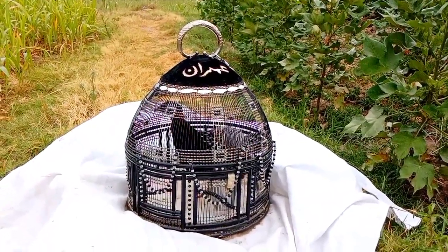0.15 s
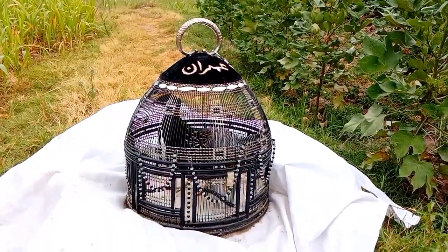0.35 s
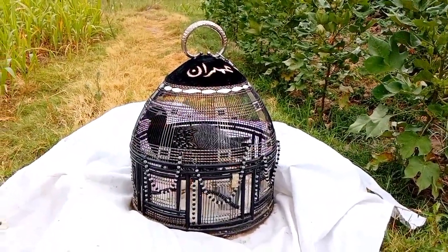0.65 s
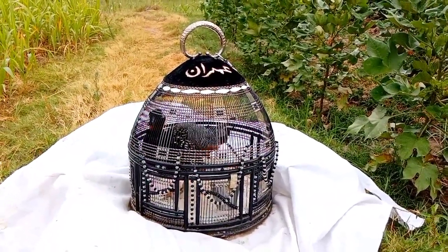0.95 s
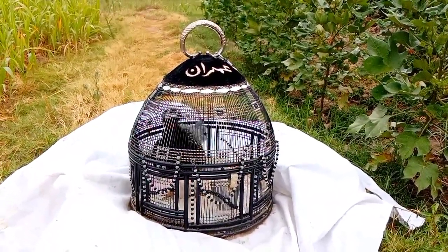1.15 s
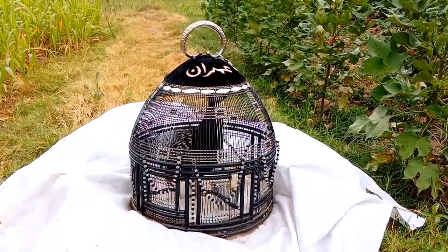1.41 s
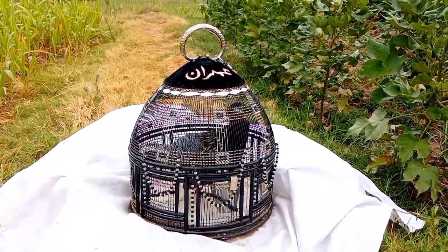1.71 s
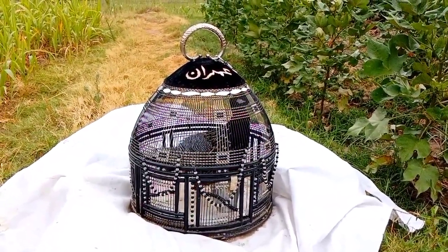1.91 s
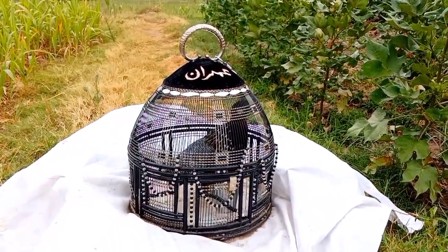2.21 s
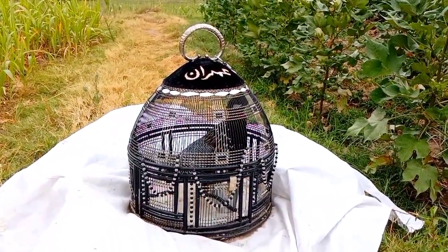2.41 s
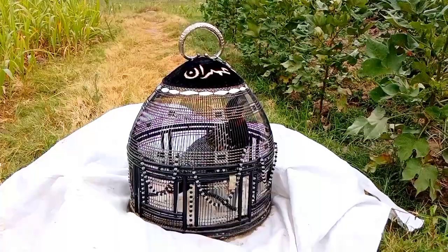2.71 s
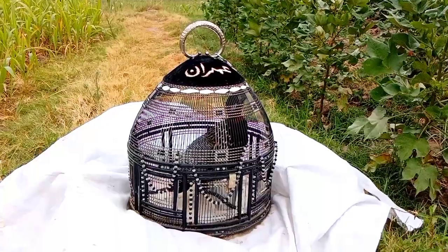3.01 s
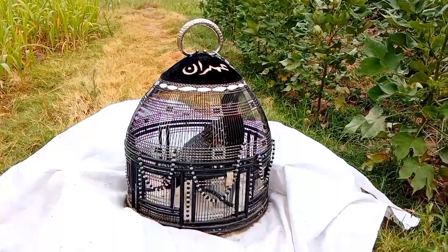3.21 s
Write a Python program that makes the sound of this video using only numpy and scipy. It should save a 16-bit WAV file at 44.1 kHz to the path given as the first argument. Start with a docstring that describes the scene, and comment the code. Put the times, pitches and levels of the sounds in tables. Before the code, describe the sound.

A francolin calls close by from a wire cage in a field. A thin nasal whine swells from 0.45 to 0.95 seconds. After a pause, a sharp falling chip and high squeak snap at 2.22-2.3. Loud, bright grating rasps follow at 2.73-2.9 and 3.05-3.3, the second briefly cracking into a squeak near 3.24. Faint engine hum, moving air, distant birds, a far whirr and early and 2.3-2.7-second high trills lie behind, with slight echo.

```python
"""Outdoors, close to a wire cage in a field: a francolin gives a thin swelling whine, a sharp click (a falling
chip and a high squeak), then two harsh rasps, the second breaking into the squeak for a moment.
The whine is drifting partials, the click gliding sines, the rasps rough pulses and noise through resonances.
Reflections near the cage hollow out the rasps, and the field echoes faintly. In the distance an engine hums
unsteadily under moving air, a far whirr, a soft wash of birds in noise bands and notes, and thin high trills."""
import sys
import numpy as np
from scipy import signal
from scipy.fft import rfft, irfft, next_fast_len
from scipy.io import wavfile
from scipy.ndimage import uniform_filter1d, map_coordinates

SR = 44100
rng = np.random.default_rng(int(sys.argv[2]) if len(sys.argv) > 2 else 0)


def store_wav(level_fs):
    """Save 16-bit WAV to argv[1]."""
    pcm = np.round(np.clip(np.atleast_2d(level_fs), -1, 1) * 32767)
    wavfile.write(sys.argv[1], SR, pcm.T.astype(np.int16))


N = 147735
TIME = np.arange(N) / SR

# partials of the distant engine: (frequency [Hz], level before the moving level [dB])
HUM_PARTIALS = [(75.4, -56.5), (96.9, -62.5), (150.7, -67.5), (188.4, -71.5), (226.1, -75.5)]
# moving level added to every engine partial: (time [s], level [dB])
HUM_LEVEL = [(0, 4), (.9, 4.5), (1.75, 2.5), (1.85, -6), (2.05, 2), (2.7, 2.5), (2.78, -32), (3.0, 6),
             (3.15, -18), (3.35, 0)]
HUM_WAVER_DB, HUM_DRIFT_RAD = 1.3, 0.3
# spectrum of the moving air: (frequency [Hz], relative level [dB])
AIR_SPECTRUM = [(15, -68), (25, -8), (50, -18), (81, 5), (202, -14), (271, -18.5), (501, -18.5),
                (691, -21.5), (1030, -16.5), (1240, -6), (1500, -16.5), (2130, -22.5), (2930, -25.5),
                (3260, -45), (4500, -30.5), (5280, -21.5), (6370, -44), (12800, -48.5), (15000, -49)]
AIR_DB = -53.5
# bands of the distant birds: (centre [Hz], width [Hz], level before the moving level [dB])
CHORUS_BANDS = [(938, 102, -12.5), (1696, 220, -12.5), (2192, 240, -7.5), (2840, 200, -9),
                (3257, 130, -5.5), (3830, 210, -15), (5200, 93, -17.5)]
# moving level of all the distant birds: (time [s], level [dB])
CHORUS_LEVEL = [(0, -55), (.35, -58.5), (.7, -55.5), (1.2, -50.5), (1.7, -50.5), (1.95, -51.5),
                (2.15, -56.5), (2.6, -55.5), (3.35, -54)]
CHORUS_SWING_DB = 1.8
# single far-off notes; the glide is a share of pitch, the level comes before the moving level
FAR_LOW_HZ, FAR_HIGH_HZ, FAR_LENGTH_S, FAR_GLIDE, FAR_DB = 1588, 3873, 0.045, 0.044, -5.5
# far-off steady whirr: (time [s], level [dB])
WHIRR_LEVEL = [(0, -65), (.2, -62), (.45, -50), (.95, -51), (1.08, -55.5), (1.3, -51.5), (1.58, -61.5),
               (1.68, -43), (1.74, -64), (1.82, -54.5), (1.92, -80), (2.6, -52.5), (3.35, -62)]
WHIRR_HZ, WHIRR_WIDTH_HZ = 1243, 40.5
# thin reeling trills: (start [s], end [s], level before mixing [dB], centre [Hz], swell [s])
TRILLS = [(-.2, 0.144, -60, 7860, 0.15), (0.303, 0.741, -61, 8900, 0.28), (2.32, 2.669, -61, 8870, 0.16)]
TRILL_RATE_HZ, TRILL_SWEEP_HZ, TRILL_SWELL_DB, TRILL_RELEASE_S = 130, 1840, 26.5, 0.0093

# effort of the whine: (time [s], level [dB])
WHINE_LEVEL = [(0.44, -84), (0.484, -45.5), (0.534, -43), (0.854, -30.5), (0.93, -30), (0.948, -37),
               (0.96, -47), (0.98, -66)]
# shared drift of the whine's partials: (time [s], pitch [ratio])
WHINE_PITCH = [(.46, 1.008), (.53, 1), (.6, .998), (.68, 1.001), (.78, 1), (.83, 1.002), (.89, .999),
               (.97, 1)]
# partials of the whine: (frequency [Hz], level before opening [dB], level when open [dB])
WHINE_PARTIALS = [(409, -24, -33), (2056, -26, -29), (2460, -17, -23), (2530, -16, -20), (2740, -9, -8),
                  (2871, -8, -5), (3084, -10, 0), (3283, -2, -5), (3429, -10, -11), (3693, -3, -9),
                  (3769, -13, -21), (4103, -15, -24), (4455, -17, -36), (5744, -22, -30), (6970, -28, -38)]
# when the whine's colour opens: (start [s], end [s])
WHINE_OPEN_S = (.56, .78)
# colour of the rustle in the whine: (frequency [Hz], relative level [dB])
WHINE_NOISE = [(1500, -19.5), (2300, -21), (2800, 10), (3700, 0), (4300, -24), (4700, -25), (5200, -8),
               (6300, -23), (7200, -9), (8000, -21), (9500, -28), (12000, -42), (15000, -49)]
WHINE_NOISE_DB = -10.5  # under the whine's tone

# clean falling chip: (time [s], pitch [Hz], level [dB])
CHIP = [(2.224, 3620, -30.5), (2.229, 2860, -29.5), (2.2325, 2277, -9.5), (2.2355, 1700, -22.5),
        (2.238, 1550, -16), (2.243, 1522, -19), (2.249, 1530, -43)]
# high squeak after it: (time [s], pitch [Hz], level [dB])
SQUEAK = [(2.261, 1513, -40), (2.263, 2713, -29), (2.265, 5900, -17.5), (2.268, 6636, -8.5),
          (2.276, 7200, -22), (2.281, 7330, -13), (2.29, 7150, -13.5), (2.2945, 6823, -9),
          (2.297, 2926, -18), (2.3, 1600, -26.5), (2.307, 1500, -54)]
# squeak that breaks into the last rasp: (time [s], pitch [Hz], level [dB])
BREAK = [(3.232, 6590, -30), (3.24, 7200, -15.5), (3.247, 7380, -19), (3.256, 7240, -20.5),
         (3.2595, 7180, -15.5), (3.263, 2750, -25), (3.266, 1666, -30), (3.274, 1588, -43)]
OVERTONE_DB, WHISTLE_WANDER = -20.5, 0.0095  # the wander is a share of pitch
# rough bursts where the voice changes register: (time [s], level [dB], t60 [s])
BURSTS = [(2.2255, -26.5, .04), (2.232, -19, .045), (2.263, -13, .025), (2.2955, -17, .055)]
# colour of the bursts: (frequency [Hz], relative level [dB])
BURST_COLOUR = [(150, -18.5), (400, -22.5), (900, -37), (1600, -4.5), (2800, 8), (4500, 4.5), (7000, 5.5),
                (10000, -3), (13000, -27), (15000, -10)]
# soft low thumps under the squeaks: (time [s], level [dB], t60 [s])
THUMPS = [(2.279, -39.5, 0.056), (2.295, -40, 0.026), (3.243, -41.5, 0.027)]
# colour of the thumps: (frequency [Hz], relative level [dB])
THUMP_COLOUR = [(80, -28), (190, 7), (420, 1), (750, -14.5), (1500, -45)]
PUFF_RISE_S = 0.004  # time for a 60 dB rise

# effort of the rasps, one table per call: (time [s], level [dB])
RASP_LEVELS = [
    [(2.734, -25), (2.742, -13), (2.854, -13.5), (2.878, -15), (2.9, -40.5)],
    [(3.05, -49), (3.064, -17.5), (3.108, -12), (3.232, -15), (3.252, -56), (3.26, -22), (3.28, -16),
     (3.305, -51)],
]
# throaty band under the rasps, one table per call: (time [s], level [dB])
THROATY_LEVELS = [
    [(2.734, -47), (2.738, -32.5), (2.776, -49.5), (2.782, -43), (2.862, -50), (2.884, -29.5), (2.9, -64)],
    [(3.053, -31), (3.065, -21), (3.113, -42), (3.165, -36.5), (3.235, -41), (3.251, -89), (3.263, -32.5),
     (3.283, -26), (3.305, -80)],
]
# pulses of the rasps: (time [s], rate [Hz], roughness [0-1])
PULSING = [(2.735, 275.5, .5), (2.78, 277.8, .4), (2.82, 275.9, .2), (2.86, 237.7, .2), (2.885, 227.7, .7),
           (3.06, 301, .9), (3.1, 294.9, .5), (3.14, 261.3, .3), (3.18, 265, .35), (3.23, 273.3, .5),
           (3.28, 257.5, .9)]
JITTER_S, SCATTER_DB, FLUTTER = 0.00006, 6, 0.015  # the flutter is a share of the pulse rate
# moving resonances of the rasps: (time [s], first [Hz], second [Hz], third [Hz])
FORMANTS = [(2.735, 2966, 3853, 5044), (2.791, 3018, 3915, 5623), (2.818, 3050, 3617, 5214),
            (2.844, 3160, 3797, 5680), (2.88, 3170, 3680, 5520), (3.08, 2750, 3750, 5315),
            (3.111, 3050, 3830, 5430), (3.15, 2860, 3890, 5380), (3.2, 2720, 3672, 5390),
            (3.235, 2800, 3880, 5620), (3.28, 2900, 3830, 5450)]
# the three resonances in order: (width [Hz], level [dB])
FORMANT_SHAPE = [(110, -10), (110, -17), (110, -21)]
# clear threads of tone on the three resonances, before a doubling and the roughness: (level [dB])
THREAD_DB = [-7.5, -13, -10.5]
THREAD_WANDER = 0.0092  # share of pitch
# bright colour of the throat: (frequency [Hz], relative level [dB])
THROAT = [(1200, -39.5), (2000, -26.5), (2400, -20.5), (2700, -5), (3000, -5), (3700, 1.5), (4500, 0.5),
          (5400, -4), (6300, -5.5), (7500, -7), (8300, -6.5), (9500, -13), (11000, -22.5), (12500, -31.5),
          (13700, -35), (15000, -23), (15600, -35)]
# colour of the throaty band: (frequency [Hz], relative level [dB])
THROAT_LOW = [(150, -55), (450, -39), (850, -34), (1100, -21.5), (1400, -10), (1620, 3), (1850, -1),
              (2200, -2.5), (2700, -15), (5000, -58)]
# bands cancelled by close reflections, reinforced where negative: (centre [Hz], width [Hz], depth [dB])
HOLLOWS = [(1960, 80, 16), (2450, 50, -2.5), (3420, 69, 12), (4073, 30, 31), (4840, 41, 14.5),
           (5600, 60, -0.5), (6250, 51, 20.5), (6960, 90, 14), (8220, 390, 13.5)]

# echo close to the cage: (frequency [Hz], t60 [s])
NEAR = [(200, .05), (3000, 0.066), (14000, 0.1)]
# ringing of the whistles in the cage: (frequency [Hz], t60 [s])
CAGE_RING = [(1000, .03), (3000, 0.066), (7000, 0.14), (14000, 0.12)]
# echo of the open field: (frequency [Hz], t60 [s])
FIELD = [(200, .4), (3000, 0.82), (7000, 0.49), (14000, .3)]
# late return from the trees: (frequency [Hz], t60 [s])
TREES = [(1000, .1), (5000, 0.18), (7000, .45), (14000, .5)]
# scatter of the trills in the bushes: (frequency [Hz], t60 [s])
LEAVES = [(5000, .05), (12000, .05)]
NEAR_DB, CAGE_RING_DB, FIELD_DB = -13.5, -15.5, -26
TREES_DB, TREES_DELAY_S = -41, 0.11
PEAK_TOP, TOP_HZ = 0.65, 15550  # microphone: peak ceiling (full scale 1) and band limit


def amp(db):
    """Decibels to gain."""
    return 10 ** (np.asarray(db) / 20)


def unit(x):
    """Scaled to rms 1."""
    return x / np.sqrt(np.mean(x ** 2) + 1e-20)


def along(points, hz):
    """Values of (Hz, value) points, read on a log frequency axis."""
    f, v = np.transpose(points)
    return np.interp(np.log(hz + 1), np.log(f + 1), v)


def curves(rows):
    """One value per sample for each column after the time."""
    s, *columns = np.transpose(rows)
    return [np.interp(TIME, s, column) for column in columns]


def envelope(rows):
    """Gain from the last column (dB), silent outside the rows."""
    return amp(curves(rows)[-1]) * (TIME >= rows[0][0]) * (TIME <= rows[-1][0])


def wobble(rate):
    """A smooth random curve with rate knots a second."""
    return map_coordinates(rng.standard_normal(int(N * rate / SR) + 4), [TIME * rate])


def turning(hz):
    """Phase in radians of a changing frequency."""
    return 2 * np.pi * np.cumsum(hz) / SR


def coloured(x, db_of_hz):
    """x through a causal minimum-phase filter with the given gain, at rms 1."""
    m = 2 * next_fast_len(N)
    cepstrum = irfft(np.log(amp(db_of_hz(np.fft.rfftfreq(m, 1 / SR))) + 1e-6))
    # folding the cepstrum forward makes the filter causal
    cepstrum[1:m // 2] *= 2
    cepstrum[m // 2 + 1:] = 0
    return unit(irfft(rfft(x, m) * np.exp(rfft(cepstrum)))[:N])


def noise(db_of_hz):
    """Steady noise of rms 1 with the given spectrum."""
    m = next_fast_len(N + SR // 4, True)
    gain = amp(db_of_hz(np.fft.rfftfreq(m, 1 / SR)))
    return unit(irfft(rfft(rng.standard_normal(m)) * gain, m)[:N])


def band(hz, width):
    """A band of noise with steep sides."""
    def shape(f):
        sides = -20 * np.log10(1 + ((f - hz) / width) ** 2)
        return sides - 10 * np.log10(1 + (f / (2 * hz)) ** 8)
    return noise(shape)


def hollows(hz):
    """Gain in dB where close reflections cancel or reinforce the sound."""
    return -sum(db / (1 + ((hz - centre) / width) ** 2) for centre, width, db in HOLLOWS)


def echo(x, decay):
    """A diffuse tail of decaying noise in which each frequency dies at its own speed."""
    hz, t, z = signal.stft(rng.standard_normal(SR), SR, nperseg=256)
    tail = signal.istft(z * amp(-60 * t / along(decay, hz)[:, None]), SR, nperseg=256)[1]
    delayed = np.pad(tail, (SR // 300, 0))
    return signal.fftconvolve(x, delayed / np.linalg.norm(tail))[:N]


def engine_hum():
    """A distant engine: low sine partials whose levels and phases waver, with a moving overall level."""
    hum = np.zeros(N)
    for hz, db in HUM_PARTIALS:
        gain = np.sqrt(2) * amp(db + HUM_WAVER_DB * wobble(14))
        hum += gain * np.sin(2 * np.pi * hz * TIME + HUM_DRIFT_RAD * wobble(10))
    return amp(curves(HUM_LEVEL)[0]) * hum


def moving_air():
    """Moving air at the microphone's place: steady, mostly low noise."""
    return amp(AIR_DB) * noise(lambda f: along(AIR_SPECTRUM, f))


def far_calls(count):
    """Short gliding notes, scattered in time and pitch and blurred by distance."""
    out = np.zeros(N + SR)
    t = np.arange(SR // 4) / SR
    u = (t - t.mean()) / FAR_LENGTH_S
    for when, height, slope, size in rng.random((count, 4)):
        pitch = FAR_LOW_HZ * (FAR_HIGH_HZ / FAR_LOW_HZ) ** height
        hz = pitch * (1 + FAR_GLIDE * (2 * slope - 1) * u)
        out[int(when * N):][:len(t)] += (0.5 + size) * np.exp(-u ** 2) * np.sin(turning(hz))
    return unit(echo(out[:N], FIELD))


def distant_birds():
    """Far-off birds merge into swinging bands of noise, with faint single notes among them."""
    wash = sum(amp(db + CHORUS_SWING_DB * wobble(33)) * band(hz, width) for hz, width, db in CHORUS_BANDS)
    return amp(curves(CHORUS_LEVEL)[0]) * (wash + amp(FAR_DB) * far_calls(count=60))


def far_whirr():
    """A far whirr: a narrow noise band at steady pitch and changing level."""
    return amp(curves(WHIRR_LEVEL)[0]) * band(WHIRR_HZ, WHIRR_WIDTH_HZ)


def trills():
    """An insect or tiny bird reels out high downward sweeps; each trill swells and stops short."""
    out = np.zeros(N)
    for start, end, db, hz, swell_s in TRILLS:
        cycle = (turning(TRILL_RATE_HZ * (1 + 0.019 * wobble(20))) / (2 * np.pi)) % 1
        pitch = hz + TRILL_SWEEP_HZ * (0.5 - cycle) + 25 * wobble(130)
        sweeps = unit(np.sin(np.pi * cycle) * np.sin(turning(pitch)))
        gate = np.clip(np.minimum(TIME - start, end - TIME) / TRILL_RELEASE_S, 0, 1)
        swell_db = -TRILL_SWELL_DB * np.clip(1 - (TIME - start) / swell_s, 0, 1)
        out += sweeps * gate * amp(db + swell_db + wobble(68))
    return out


def whine():
    """A nasal note whose colour opens as it swells; its partials drift together over a soft rustle."""
    clock = turning(curves(WHINE_PITCH)[0] * (1 + 0.0008 * wobble(60)))
    opening = np.interp(TIME, WHINE_OPEN_S, (0, 1))
    tone, power = np.zeros(N), np.zeros(N)
    for hz, closed_db, open_db in WHINE_PARTIALS:
        gain = amp(closed_db + (open_db - closed_db) * opening + 1.6 * wobble(20))
        tone += gain * np.cos(hz * clock + 0.16 * wobble(20))
        power += gain ** 2
    tone = unit(tone / np.sqrt(power))  # the effort alone sets the level
    rustle = noise(lambda f: along(WHINE_NOISE, f) + hollows(f))
    return envelope(WHINE_LEVEL) * (tone + amp(WHINE_NOISE_DB) * rustle)


def whistles():
    """Chip, squeak and break: fast clean sine glides with a weak octave."""
    out = np.zeros(N)
    for rows in (CHIP, SQUEAK, BREAK):
        phase = turning(curves(rows)[0] * (1 + WHISTLE_WANDER * wobble(700)))
        tone = np.sin(phase) + amp(OVERTONE_DB) * np.sin(2 * phase)
        out += np.sqrt(2) * envelope(rows) * tone
    return out


def puffs(rows, colour):
    """Short noisy cracks or thumps as the voice jumps between registers."""
    level = np.zeros(N)
    for s, db, t60 in rows:
        slope_s = np.where(TIME < s, PUFF_RISE_S, t60)
        level += amp(db - 60 * np.abs(TIME - s) / slope_s)
    return level * noise(lambda f: along(colour, f) + hollows(f))


def pulse_train(phase, rough):
    """Band-limited clicks, one a cycle, late or early by the roughness and uneven in strength."""
    cycles = np.arange(1, phase[-1] // (2 * np.pi))
    at = np.interp(cycles * 2 * np.pi, phase, np.arange(N))
    chance = rng.standard_normal((N // 100, 2))[:len(at)]
    at = at + SR * JITTER_S * chance[:, 0] * rough[at.astype(int)]
    # a windowed sinc places each click between samples
    taps = at.astype(int)[:, None] + np.arange(-7, 9)
    offset = taps - at[:, None]
    click = np.sinc(offset) * np.cos(np.pi * offset / 16) ** 2
    strength = amp(SCATTER_DB * chance[:, 1:])
    pulses = unit(np.bincount(np.clip(taps, 0, N - 1).ravel(), (click * strength).ravel(), N))
    return coloured(pulses, lambda f: -12 / (1 + (6500 / (f + 1)) ** 6))  # softer treble


def resonance(x, hz, width_hz):
    """A resonance with a moving centre: x is shifted to zero frequency, smoothed and shifted back."""
    carrier = np.exp(1j * turning(hz))
    smoothed = signal.lfilter([1], [1, -np.exp(-np.pi * width_hz / SR)], x / carrier)
    return unit((smoothed * carrier).real)


def rasps():
    """Uneven pulses and gated turbulence ring the throat and its moving resonances."""
    hz, rough = curves(PULSING)
    phase = turning(hz * (1 + FLUTTER * wobble(110)))
    pulses = pulse_train(phase, rough)
    turbulence = unit(rng.standard_normal(N) * (1 + 0.3 * np.cos(phase - 2)))
    source = 0.59 * np.sqrt(1 - rough) * pulses + np.sqrt(rough) * turbulence
    bright = coloured(source, lambda f: along(THROAT, f))
    centres = curves(FORMANTS)
    ringing = sum(amp(db) * resonance(bright, centre, width)
                  for centre, (width, db) in zip(centres, FORMANT_SHAPE))
    voice = unit(bright + ringing)
    # threads of tone come clear where the rasp is least rough
    for centre, db in zip(centres, THREAD_DB):
        thread = np.sin(turning(centre * (1 + THREAD_WANDER * wobble(250))))
        voice = voice + 2 * amp(db) * (1 - rough) ** 2 * thread
    # the membrane's swing is limited
    voice = voice / np.sqrt(np.abs(uniform_filter1d(voice ** 2, size=110)) + 0.065)
    voice = coloured(voice, lambda f: hollows(f) - 25 / (1 + (f / 1700) ** 8))
    throaty = coloured(source, lambda f: along(THROAT_LOW, f) + hollows(f))
    return voice * sum(map(envelope, RASP_LEVELS)) + throaty * sum(map(envelope, THROATY_LEVELS))


def tree_return(clear):
    """The whistles' treble comes back late and diffuse from the trees."""
    high = signal.sosfilt(signal.butter(4, 5000, "high", fs=SR, output="sos"), clear)
    return amp(TREES_DB) * np.interp(TIME - TREES_DELAY_S, TIME, echo(high, TREES), left=0)


def scene():
    """The caged bird with its near and far echoes, before the distant background and the trills."""
    background = engine_hum() + moving_air() + distant_birds() + far_whirr()
    reeling = trills()
    reeling = 0.44 * reeling + 0.95 * echo(reeling, LEAVES)
    clear = whistles()
    bird = whine() + clear + puffs(BURSTS, BURST_COLOUR) + puffs(THUMPS, THUMP_COLOUR) + rasps()
    near = amp(NEAR_DB) * echo(bird, NEAR) + amp(CAGE_RING_DB) * echo(clear, CAGE_RING)
    far = amp(FIELD_DB) * echo(bird, FIELD) + tree_return(clear)
    return (bird + near + far + background + reeling)[None]


def record(dry):
    """The microphone rounds the highest peaks and keeps nothing above its band limit."""
    soft = dry / (1 + np.abs(dry / PEAK_TOP) ** 8) ** (1 / 8)
    m = next_fast_len(N + SR // 2)
    keep = np.clip((TOP_HZ - np.fft.rfftfreq(m, 1 / SR)) / 200 + 0.5, 0, 1)  # 200 Hz wide edge
    return irfft(rfft(soft, m) * keep, m)[..., :N]


dry = scene()
out = record(dry)
store_wav(out)
```